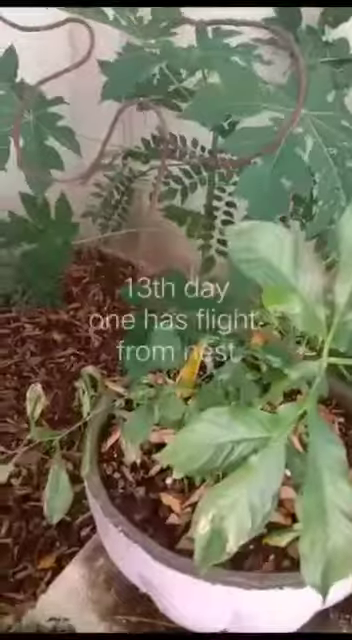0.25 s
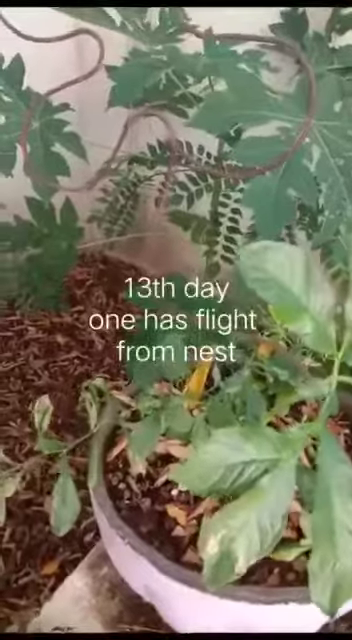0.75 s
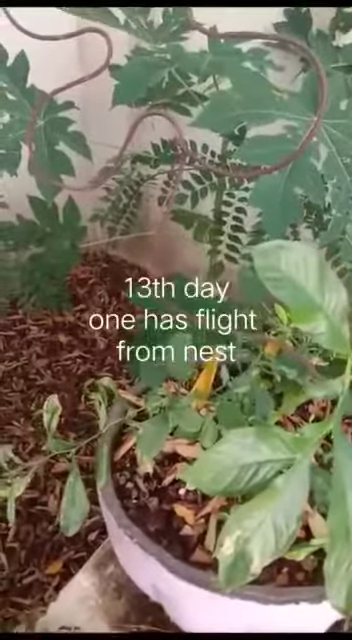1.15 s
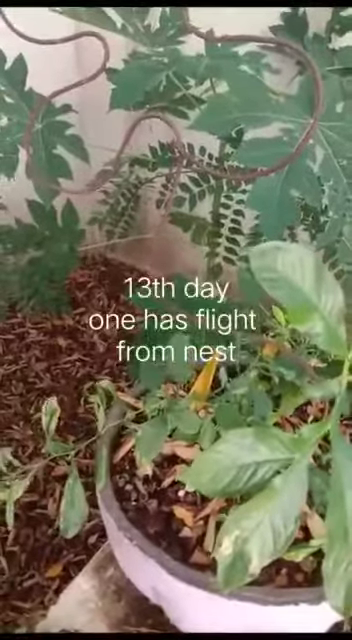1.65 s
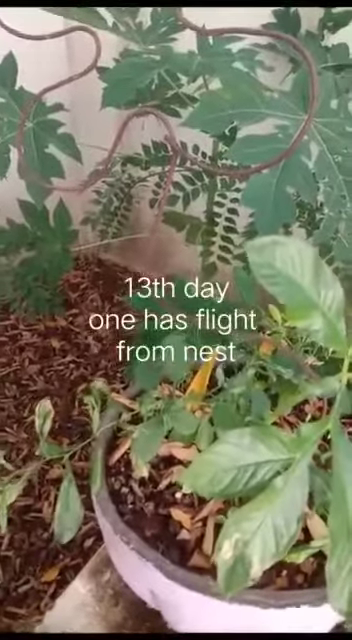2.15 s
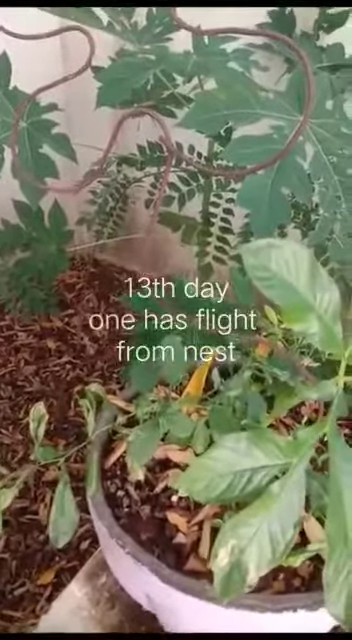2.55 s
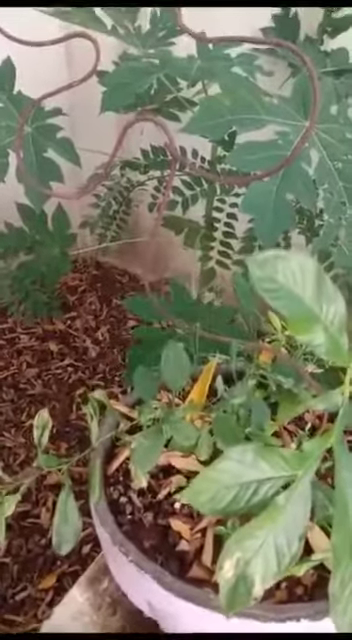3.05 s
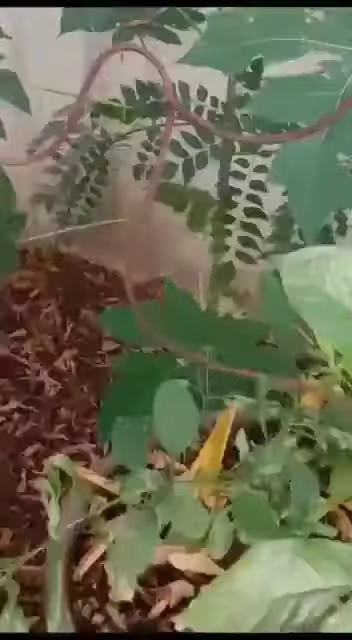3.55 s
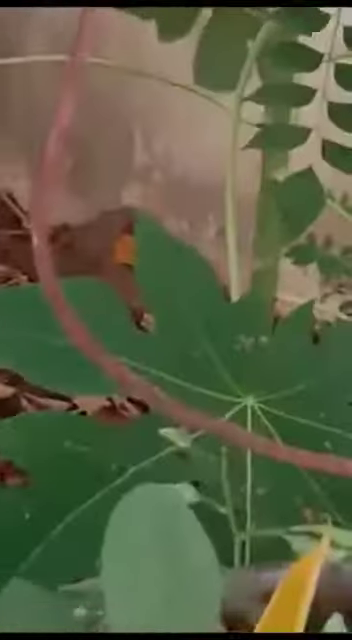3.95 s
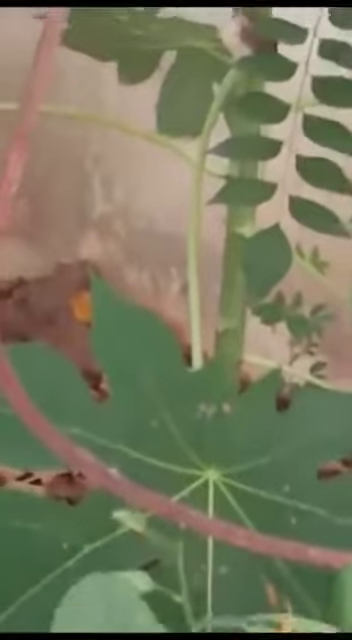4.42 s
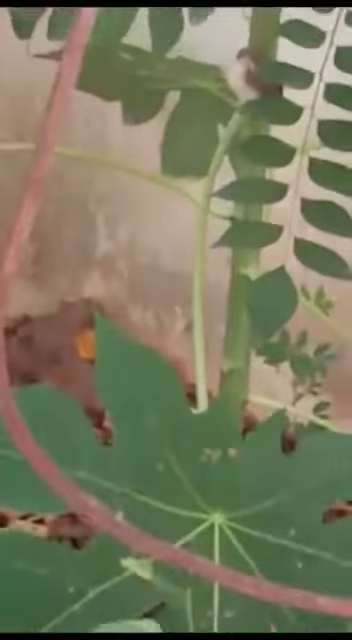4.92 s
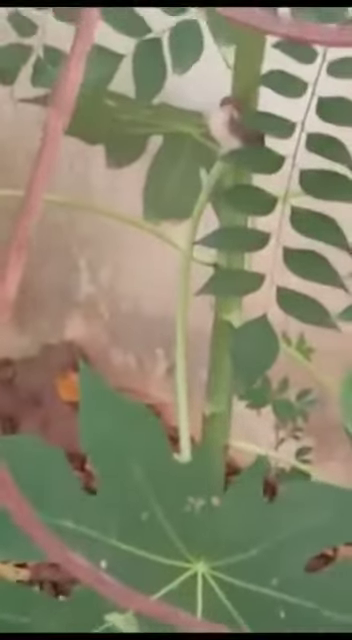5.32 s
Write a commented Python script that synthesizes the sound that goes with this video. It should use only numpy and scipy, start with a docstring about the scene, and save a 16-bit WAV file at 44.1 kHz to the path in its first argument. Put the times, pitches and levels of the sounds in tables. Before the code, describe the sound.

Sharp, raspy bird chirps and one louder squeal sound at intervals above a low outdoor rumble and distant pump hum.

```python
"""In a small walled garden, a distant pump throbs and ticks about 15 times a second over a low rumble.
The hand-held, nearly mono microphone takes soft scuffs and one bump as a tailorbird starts to scold:
sharp chips that whistle up and rasp down, one at first and two more a second later.
Another bird whistles faintly, far off. At 2.5 s the tailorbird lets out a louder slurred squeal;
the pump chafes, the far bird whistles twice more, and two last chips come near 5 s."""
import sys
import numpy as np
from scipy import signal
from scipy.fft import rfft, irfft, next_fast_len
from scipy.io import wavfile
from scipy.ndimage import map_coordinates

SR = 44100
rng = np.random.default_rng(int(sys.argv[2]) if len(sys.argv) > 2 else 0)


def unload_audio(sound):
    """Save the sound as a 16-bit wav file, at the path given as the first command line argument."""
    columns = np.transpose(np.atleast_2d(sound))
    # keep every value between -1 and 1, then stretch to whole-number steps
    steps = np.round(np.clip(columns, -1, 1) * 32767)
    wavfile.write(sys.argv[1], SR, steps.astype(np.int16))


N = 246078
TOP_HZ = 15600
NOTE_EDGE_S = 0.003


def amp(db):
    """Decibels to gain."""
    return 10 ** (np.asarray(db) / 20)


def unit(x):
    """Scaled to rms 1."""
    return x / np.sqrt(np.mean(np.abs(x) ** 2) + 1e-20)


def along(points, hz):
    """Read (Hz, value) points on a log frequency axis."""
    freqs, values = np.transpose(points)
    return np.interp(np.log(hz + 1), np.log(freqs + 1), values)


def clock():
    """The time of every sample."""
    return np.arange(N) / SR


def span(length):
    """Time along a note of this length."""
    return np.arange(max(round(length * SR), 64)) / SR


def fader(points):
    """A gain that rides through (seconds, dB) points."""
    times, levels_db = np.transpose(points)
    return amp(np.interp(clock(), times, levels_db))


def swell(start, length):
    """A smooth rise and fall."""
    return np.sin(np.pi * np.clip((clock() - start) / length, 0, 1))


def fade(t, edge):
    """Soft start and end of a note, edge seconds long."""
    return np.sin(np.pi / 2 * np.clip(np.minimum(t, t[-1] - t) / edge, 0, 1)) ** 2


def wobble(rate, size=N):
    """A smooth random curve, rate knots a second."""
    knots = rng.standard_normal(int(size * rate / SR) + 4)
    return map_coordinates(knots, [np.arange(size) * rate / SR])


def filtered(x, response):
    """Filter x by a complex response of frequency."""
    size = next_fast_len(N + SR // 2)
    return irfft(rfft(x, size) * response(np.fft.rfftfreq(size, 1 / SR)), size)[..., :N]


def resonance(f, hz, width):
    """Response of one resonance."""
    return 1j * f * width / (hz * hz - f * f + 1j * f * width)


def noise(response):
    """Coloured noise of rms 1."""
    return unit(filtered(rng.standard_normal(N), response))


def add(track, start, sound):
    """Mix a sound into the track, start seconds in."""
    part = track[max(round(start * SR), 0):][:len(sound)]
    part += sound[:len(part)]


def outdoors():
    """A low rumble that swells now and then, under a gently wavering wash of air."""
    # The colours of the rumble and the air. Each row: frequency in Hz, relative level in dB.
    rumble_eq = [(25, -29.5), (50, -8.5), (80, -11), (105, 7), (140, 3), (200, -13), (320, -13), (600, -55),
                 (3000, -60)]
    air_eq = [(88, -30), (150, -16), (234, -10.5), (411, -9.5), (877, -16), (1110, -14.5), (1270, -8.5),
              (1660, -22), (2180, -15.5), (2550, -18), (3760, -24), (4560, -31.5), (5990, -30),
              (8010, -43.5), (15500, -43)]
    # Swells of the rumble. Each row: time of the peak in seconds, length in seconds, level in dB.
    surges = [(1.15, 1.5, -56), (2.132, 0.1, -48.5), (2.535, 0.17, -46.5), (3.826, 0.28, -52.5),
              (4.382, 0.28, -54), (5.135, 0.36, -54.5)]
    # The air's fader ride. Each row: time in seconds, level in dB.
    air_ride = [(0, -57.5), (1.3, -59.5), (1.9, -63), (2.6, -60.5), (3.4, -61.5), (5.58, -63)]
    surging = sum(amp(db) * swell(peak - length / 2, length) for peak, length, db in surges)
    bed = amp(-59 + wobble(9))
    rumble = np.hypot(bed, surging) * noise(lambda f: amp(along(rumble_eq, f)))
    breeze = amp(1.1 * wobble(12))
    air = fader(air_ride) * breeze * noise(lambda f: amp(along(air_eq, f)))
    return rumble + air


def chafing(start_s=2.52, length_s=2.26, edge_s=0.62, rest_db=-75.5, chafe_db=-63):
    """The gain of the pump's squeak: it grows, holds while the pump chafes, and eases off."""
    t = clock() - start_s
    friction = np.clip(np.minimum(t, length_s - t) / edge_s, 0, 1)
    return amp(rest_db + (chafe_db - rest_db) * friction)


def pump(stroke_hz=15.33, first_stroke_s=0.033):
    """Every stroke feeds the drone, rattles the casing and rubs out a squeak; the housing whirs on."""
    # The drone's partials. Each row: multiple of the stroke rate, rms level in dB.
    partials = [(4, -85), (5, -72), (6, -68.5), (7, -61), (8, -66.5), (9, -70.5), (10, -75.5), (12, -66.5),
                (13, -74), (16, -87), (17, -79.5), (25, -77), (26, -70.5), (27, -73.5), (28, -74),
                (29, -81.5), (30, -74.5), (33, -83.5)]
    # The casing's resonances. Each row: centre in Hz, width in Hz, relative level in dB.
    modes = [(755, 155, -0.5), (2233, 87, 6.5), (3740, 153, -1), (5300, 370, -14), (6090, 650, -9),
             (9400, 390, -20.5)]
    # The whir's fader ride. Each row: time in seconds, level in dB.
    whir_ride = [(0, -58), (1.2, -62), (2.0, -65), (5.58, -66.5)]
    turn = 2 * np.pi * stroke_hz * (clock() - first_stroke_s)
    drifting_turn = turn + 0.0029 * wobble(1.9)
    drone = sum(amp(db) * np.sqrt(2) * np.sin(k * drifting_turn + rng.uniform(0, 2 * np.pi))
                for k, db in partials)
    strokes = unit(np.exp(0.9 * np.cos(turn)) * amp(2 * wobble(15)))
    casing = noise(lambda f: sum(amp(db) * np.abs(resonance(f, hz, width)) ** 2
                                 for hz, width, db in modes))
    rubs = unit(np.exp(2.3 * np.cos(turn + 0.5)))  # just ahead of each stroke
    squeak = rubs * noise(lambda f: resonance(f, hz=2152, width=120) ** 2)
    whir = noise(lambda f: resonance(f, hz=1256, width=65) ** 2)
    return drone + amp(-68) * strokes * casing + chafing() * squeak + fader(whir_ride) * whir


def scuffs():
    """Faint scuffs, rustles and thin far-off twitters: brief, grainy swells of noise."""
    # Each row: start in seconds, length in seconds, centre in Hz, width in Hz, level in dB.
    swells = [(0, 0.078, 2910, 1060, -42), (0.058, 0.085, 2410, 2000, -47), (0.063, 0.12, 3910, 750, -54.5),
              (0.078, 0.16, 1140, 1820, -59), (0.417, 0.64, 2930, 1550, -77.5), (.658, .06, 2160, 250, -60),
              (.727, 0.037, 3730, 600, -60.5), (0.836, 0.12, 1280, 740, -53),
              (1.027, 0.15, 640, 1260, -51.5), (2.042, 0.13, 2450, 2050, -63),
              (2.137, 0.064, 3780, 350, -62), (2.803, 0.56, 5040, 1200, -71.5),
              (4.14, 0.4, 5900, 1070, -72.5)]
    rustle = np.zeros(N)
    for start, length, hz, width, db in swells:
        band = noise(lambda f: resonance(f, hz, width / 2) ** 2)
        rustle += amp(db) * swell(start, length) * band
    grain = unit(amp(2.2 * wobble(250)))
    return rustle * grain


def syrinx(hz, slope_db, count):
    """Harmonics tilt by slope_db an octave; the throat lifts whichever passes through its resonance."""
    # The bird's windpipe and open beak. Each row: frequency in Hz, gain in dB.
    throat = [(900, -66), (1250, -11), (1800, -21.5), (2350, -14), (2900, 8), (3550, -3), (4200, -16),
              (5600, -16), (7100, -31), (8200, -41.5), (10300, -44.5), (12000, -53.5), (15000, -51)]
    k = np.arange(1, count + 1)[:, None]
    phase = 2 * np.pi * np.cumsum(hz) / SR
    gain = amp(along(throat, k * hz) + slope_db * np.log2(k)) * (k * hz < TOP_HZ)
    return np.sum(gain * np.sin(k * phase), axis=0)


def chip_shape(whistle_s, crest, rasp_s, top_hz, end_hz, steepness,
               whistle_db, swell_db, rasp_db, end_db, end_rough):
    """Time, pitch, level and roughness of a chip: it arches, catches, then drops into a sagging rasp."""
    climb, whistle_rough = 0.1223, 0.13  # the climb is a share of the top pitch
    rasp_hz, rasp_rough = 2488, 0.43  # just after the break
    catch_db, catch_s = 14, 0.0013
    t = span(whistle_s + rasp_s)
    whistling = t < whistle_s
    into_whistle = np.clip(t / whistle_s, 0, 1)
    into_rasp = np.clip((t - whistle_s) / rasp_s, 0, 1)
    arch_hz = top_hz * (1 - climb * (1 - into_whistle / crest) ** 2)
    sag_hz = end_hz + (rasp_hz - end_hz) * (1 - into_rasp) ** steepness
    hz = np.where(whistling, arch_hz, sag_hz)
    rising_db = whistle_db - swell_db * (1 - into_whistle) ** 1.53
    db = np.where(whistling, rising_db, rasp_db + (end_db - rasp_db) * into_rasp)
    db -= catch_db * np.exp(-((t - whistle_s) / catch_s) ** 2)
    rough = np.where(whistling, whistle_rough, rasp_rough + (end_rough - rasp_rough) * into_rasp)
    return t, hz, db, rough


def chips():
    """A clean whistle jumps down into a rasp, whose second harmonic takes over the throat's resonance."""
    # The scolding. Each row: start in seconds, whistle length in seconds, share of it spent climbing,
    # rasp length in seconds, top and final pitch in Hz, steepness of the fall, whistle drive and its
    # swell in dB, first and last rasp drive in dB, final roughness from 0 to 1, noise gain in dB.
    calls = [ (0.166, .035, 0.47, 0.055, 3520, 1397, 1.93, -31.5, 15.5, -32.5, -29.5, 0.4, -7.5),
             (1.261, 0.021, 0.54, 0.066, 3578, 1260, 1.88, -29.5, 9.5, -31.5, -26.5, 0.21, -5.5),
             (1.396, 0.033, .8, .061, 3554, 1195, 1.53, -29.5, 13.5, -29.5, -29, 0.24, -6),
             (4.833, .032, 0.68, .060, 3743, 1400, 3.3, -24, 13, -26, -34, 0.49, -7),
             (4.986, .021, 0.6, 0.071, 3553, 1438, 1.5, -24.5, 9, -26.5, -35.5, 0.65, -7), ]
    # The colour of the noise with the rasp: breath, plus a thin 15 kHz recorder fizz.
    # Each row: frequency in Hz, relative level in dB.
    noise_eq = [(1500, -13.5), (2800, 15), (4500, -36), (7000, -10.5), (8500, -31), (12500, -32.5),
                (15000, -13.5)]
    voice, noise_gain = np.zeros(N), np.zeros(N)
    for start, *shape, noise_db in calls:
        t, hz, db, rough = chip_shape(*shape)
        gain = amp(db) * fade(t, NOTE_EDGE_S)
        hz = hz * (1 + (0.0059 + 0.1074 * rough) * wobble(696, len(t)))
        flutter = unit(amp(10 * rough * wobble(347, len(t))))
        slope_db = np.interp(hz, [1260, 1858, 2420, 3440], [-8, -6.5, -5, 2])  # higher is brighter
        add(voice, start, gain * flutter * syrinx(hz, slope_db, count=4))
        add(noise_gain, start, gain * rough * amp(noise_db))
    return voice + noise_gain * noise(lambda f: amp(along(noise_eq, f)))


def bump(start_s=0.2357, decay_s=0.03, soft_hz=1900):
    """A knock on the microphone: a pressure step that swings back through the bass cut."""
    def bass_cut(f, hz, width):
        return resonance(f, hz, width) * 1j * f / width

    def thud(f):
        treble_cut = 1 / (1 - (f / soft_hz) ** 2 + 1.1j * f / soft_hz)
        return bass_cut(f, hz=75, width=45) * bass_cut(f, hz=105, width=130) * treble_cut

    t = clock() - start_s
    step = (t > 0) * np.exp(-np.abs(t) / decay_s)
    return amp(-11.5) * filtered(step, thud)


def slurs():
    """Falling notes run together into the squeal; strain makes them brighter, shakier and airier."""
    # One faint lead-in to a chip, then the squeal. Each row: start and length in seconds, first and
    # last pitch in Hz, steepness of the fall, first and last drive in dB, strain from 0 to 1.
    notes = [ (1.234, 0.027, 3660, 3370, 0.96, -60, -42.5, .2),
             (2.52, .035, 4670, 3086, 3.2, -24, -39, 0.41),
             (2.558, .039, 3480, 3316, 0.95, -26, -21.5, 0.43),
             (2.594, 0.026, 2780, 2485, 3.6, -30, -32.5, 0.75),
             (2.598, .027, 3270, 3108, 0.944, -26.5, -29.5, 0.4),
             (2.617, 0.019, 4300, 3960, 0.81, -25, -25, 0.5), (2.632, .019, 3803, 3470, 1.9, -17, -27, 0.1),
             (2.644, .030, 3034, 2770, 1.1, -36.5, -38, 1.0),
             (2.676, .019, 2720, 2136, 1.08, -34, -27, 0.55), ]
    # The colour of the noise with the squeal: breath, plus a thin 15 kHz recorder fizz.
    # Each row: frequency in Hz, relative level in dB.
    noise_eq = [(1800, -0.5), (3200, 13.5), (5800, -4.5), (7800, -13), (10800, 0.5), (12300, -51),
                (15000, -13)]
    voice, noise_gain = np.zeros(N), np.zeros(N)
    for start, length, first_hz, last_hz, steepness, first_db, last_db, strain in notes:
        t = span(length)
        remaining = 1 - t / t[-1]
        hz = last_hz + (first_hz - last_hz) * remaining ** steepness
        hz *= 1 + (0.008 + 0.007 * strain) * wobble(800, len(t))
        db = last_db + (first_db - last_db) * remaining
        gain = amp(db + 2 * strain * wobble(300, len(t))) * fade(t, NOTE_EDGE_S)
        add(voice, start, gain * syrinx(hz, slope_db=-10 + 18.2 * strain, count=3))
        add(noise_gain, start, gain * strain)
    return voice + amp(-21.5) * noise_gain * noise(lambda f: amp(along(noise_eq, f)))


def far_bird(held_hz=1526, arch_s=0.29, arch_lean=0.99):
    """Whistles that hold, arch up and drop, wavering on their way through the air."""
    # Each row: start and hold in seconds, top pitch in Hz, dry levels of the onset and the arch in dB.
    whistles = [(1.579, 0.037, 1750, -84, -75.5), (2.91, 0.11, 1817, -64.5, -72),
                (4.39, .13, 1798, -59.5, -74)]
    voice = np.zeros(N)
    for start, hold_s, top_hz, onset_db, arch_db in whistles:
        t = span(hold_s + arch_s)
        into_arch = np.clip((t - hold_s) / arch_s, 0, 1)
        hz = held_hz + (top_hz - held_hz) * np.sin(np.pi * into_arch ** arch_lean)
        hz *= 1 + 0.012 * wobble(120, len(t))
        db = onset_db + (arch_db - onset_db) * np.clip(t / hold_s, 0, 1) ** 2
        tone = np.sin(2 * np.pi * np.cumsum(hz) / SR)
        add(voice, start, amp(db) * fade(t, edge=0.0072) * tone)
    return voice


def yard(x, near_db, tail_db):
    """Close surfaces answer within a few hundredths of a second; the whole yard rings on."""
    # The yard's reverb. Each row: frequency in Hz, seconds to die away by 60 dB.
    decay_times = [(200, 0.54), (1500, 0.28), (3000, 0.36), (6000, 0.34), (14000, 0.14)]
    # Early reflections. Each row: delay in seconds, level in dB relative to near_db.
    walls = [(.0037, -19.5), (.0083, -1.5), (0.011, -5), (.0176, -17), (.0243, -12), (.0318, -30)]
    hz, t, spectrum = signal.stft(rng.standard_normal(SR * 3 // 4), SR, nperseg=256)
    decay = amp(-60 * t / along(decay_times, hz)[:, None])
    tail = signal.istft(spectrum * decay, SR, nperseg=256)[1]
    tail *= np.clip(np.arange(len(tail)) / SR / 0.0053, 0, 1)  # soften the attack
    echo = amp(tail_db) * tail / np.linalg.norm(tail)
    for delay, db in walls:
        echo[round(delay * SR)] += amp(near_db + db)
    return x + signal.fftconvolve(x, echo)[:N]


def scene():
    """All sources reach both channels alike, but for a trace of hiss; the far bird is mostly echo."""
    tailorbird = yard(chips(), near_db=-5, tail_db=-0.5) + yard(slurs(), near_db=-4, tail_db=-1)
    far = amp(-1.5) * yard(far_bird(), near_db=-39, tail_db=10.5)
    mid = tailorbird + far + pump() + outdoors() + scuffs() + bump()
    side_hiss = amp(-78.5) * noise(lambda f: 1 / np.sqrt(1 + (f / 1400) ** 2))
    return np.array([mid + side_hiss, mid - side_hiss])


def record(dry):
    """The mix fades in quickly and is cut off above the band limit."""
    fade_in = np.clip(clock() / 0.15, 0, 1)
    return filtered(dry * fade_in, lambda hz: hz < TOP_HZ)


dry = scene()
out = record(dry)
unload_audio(out)
```